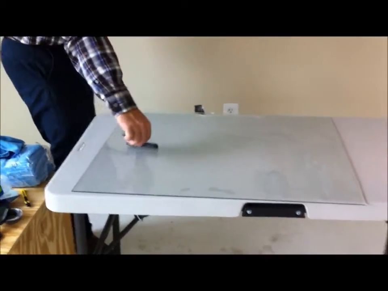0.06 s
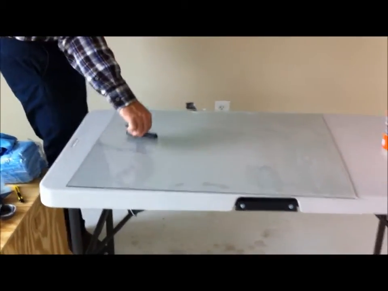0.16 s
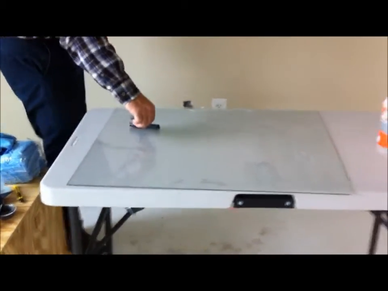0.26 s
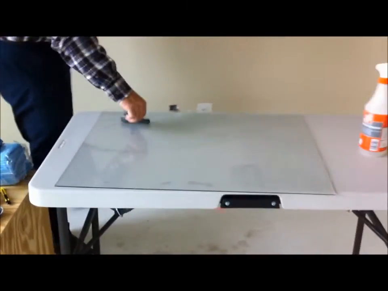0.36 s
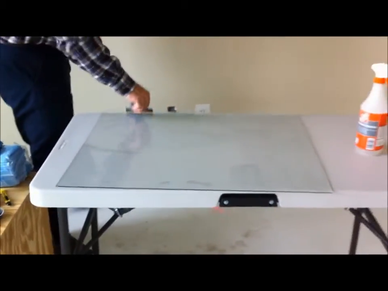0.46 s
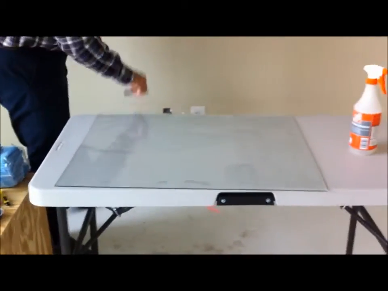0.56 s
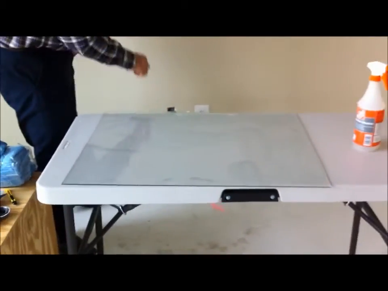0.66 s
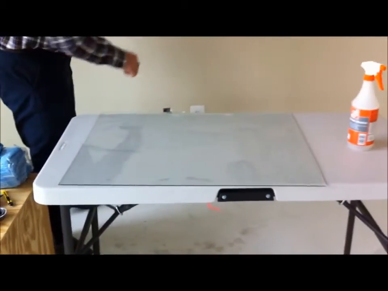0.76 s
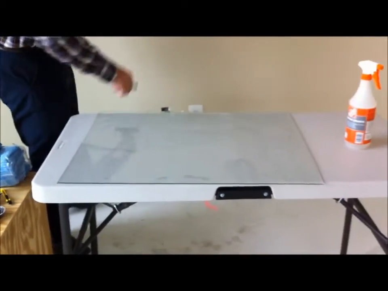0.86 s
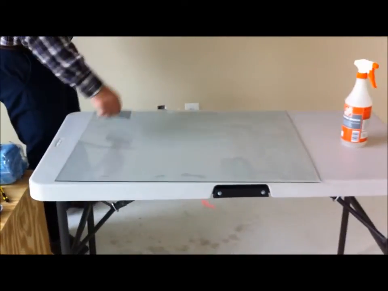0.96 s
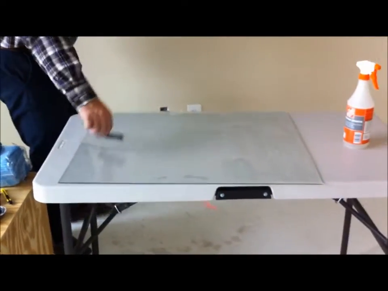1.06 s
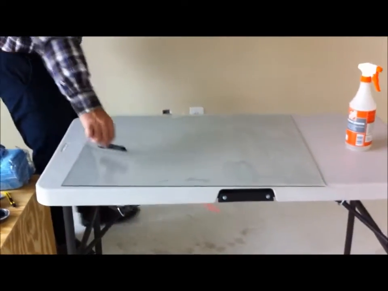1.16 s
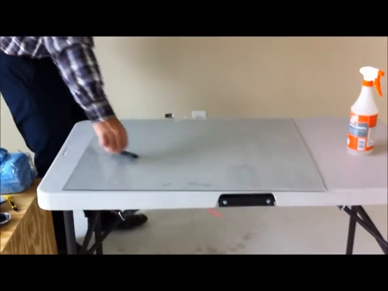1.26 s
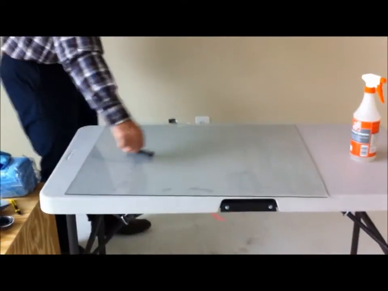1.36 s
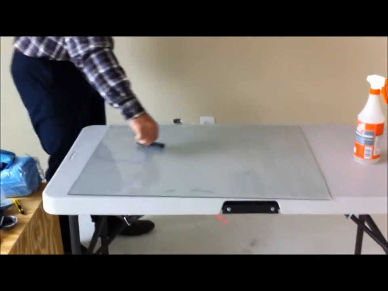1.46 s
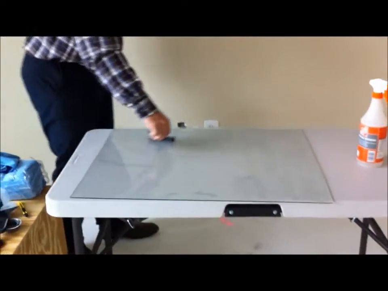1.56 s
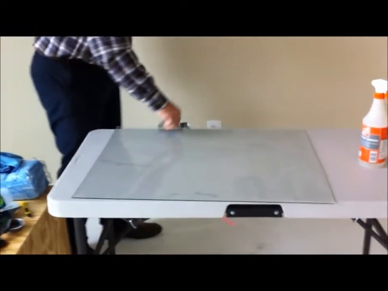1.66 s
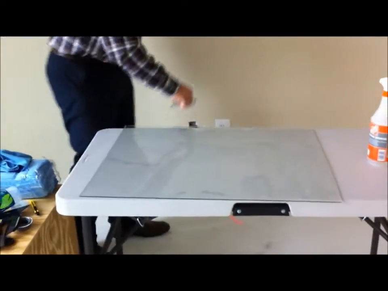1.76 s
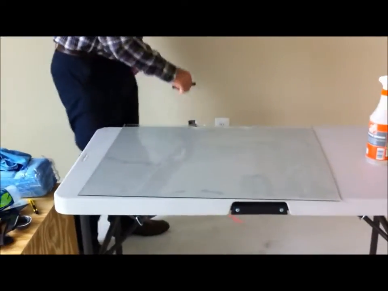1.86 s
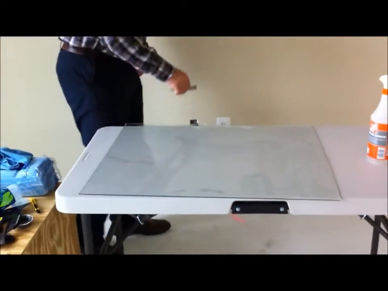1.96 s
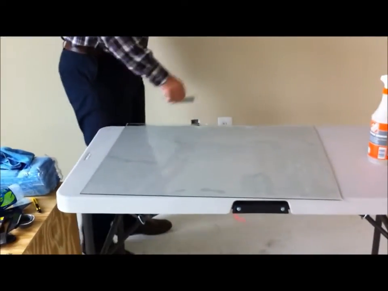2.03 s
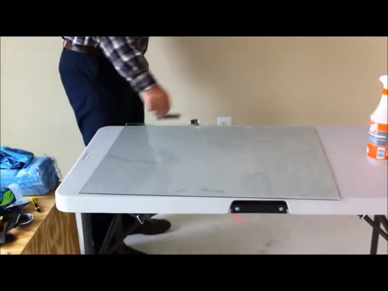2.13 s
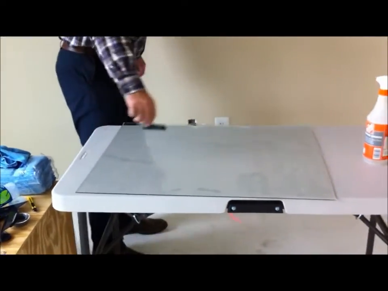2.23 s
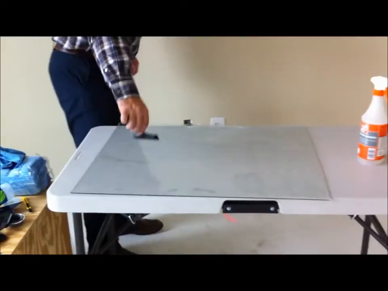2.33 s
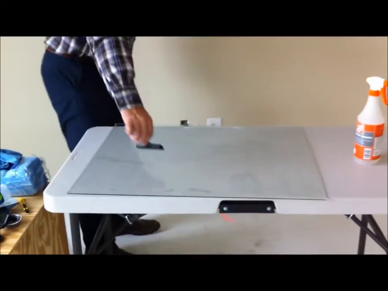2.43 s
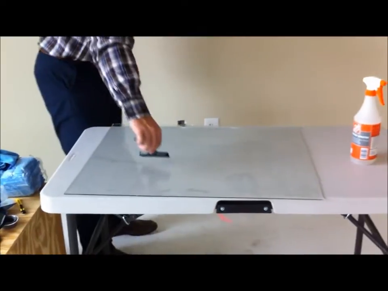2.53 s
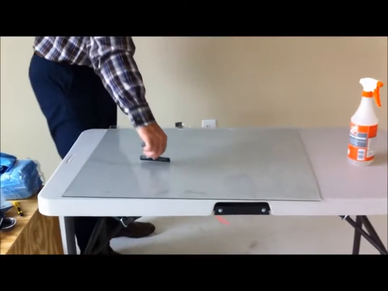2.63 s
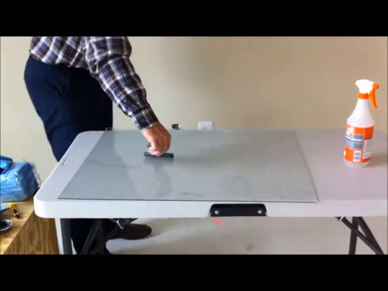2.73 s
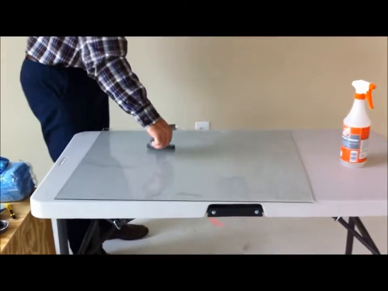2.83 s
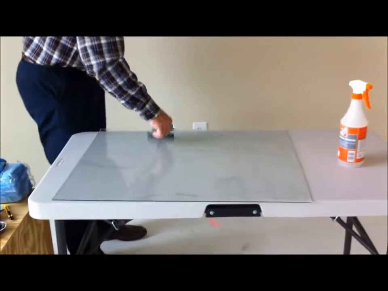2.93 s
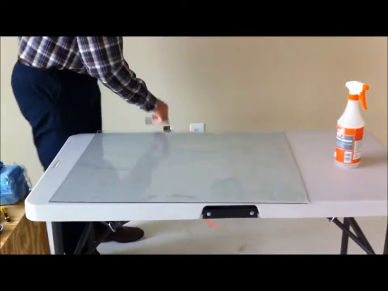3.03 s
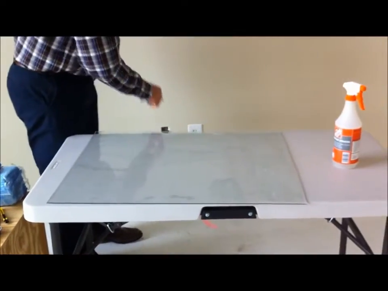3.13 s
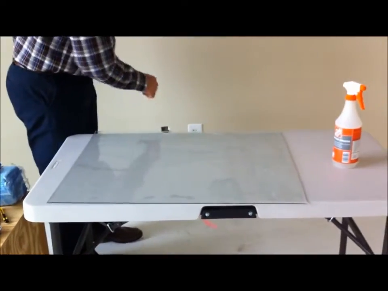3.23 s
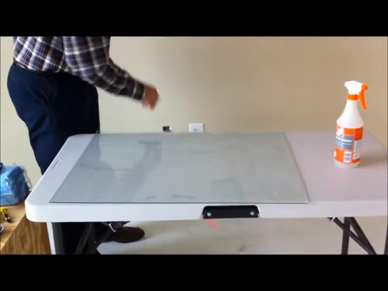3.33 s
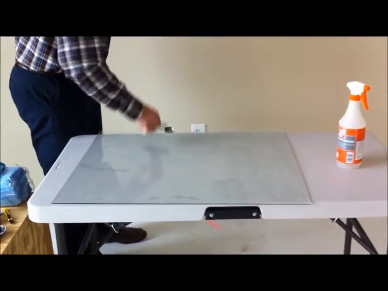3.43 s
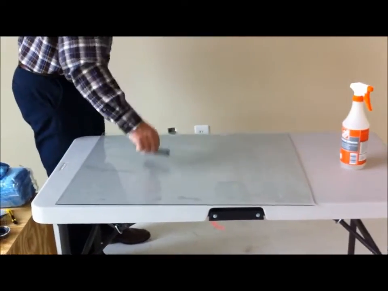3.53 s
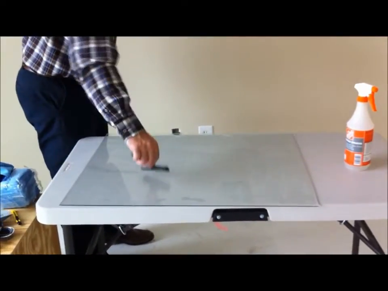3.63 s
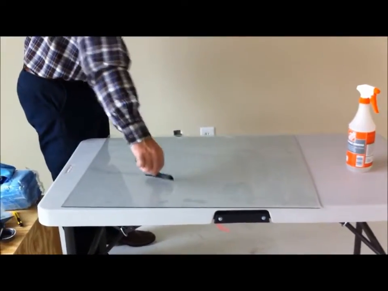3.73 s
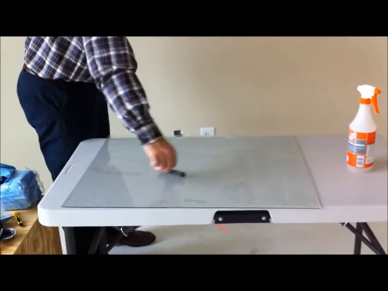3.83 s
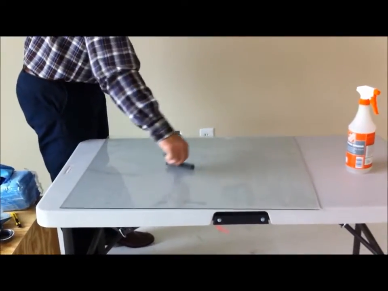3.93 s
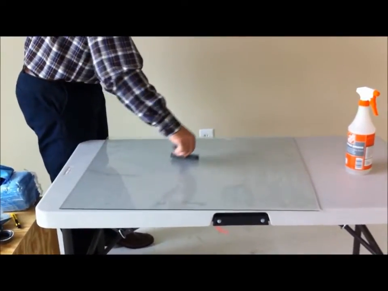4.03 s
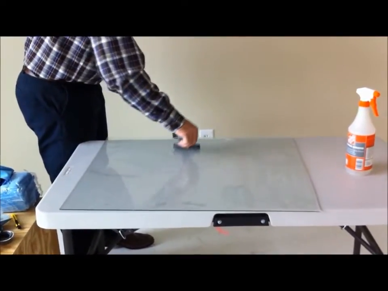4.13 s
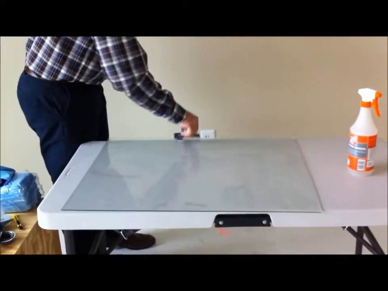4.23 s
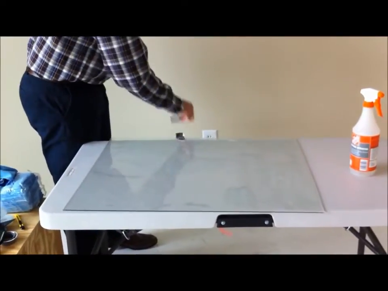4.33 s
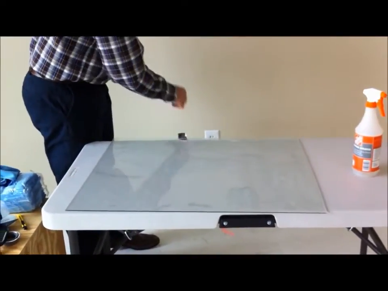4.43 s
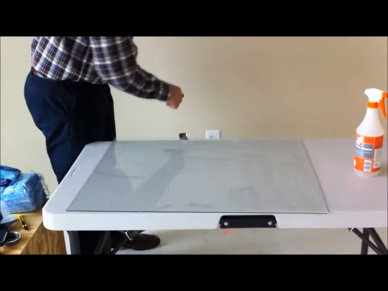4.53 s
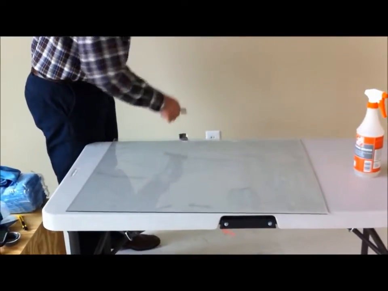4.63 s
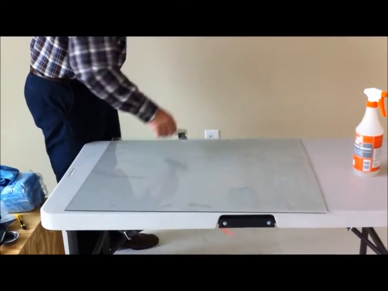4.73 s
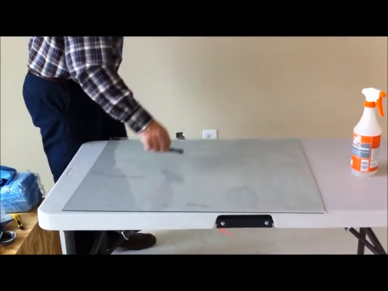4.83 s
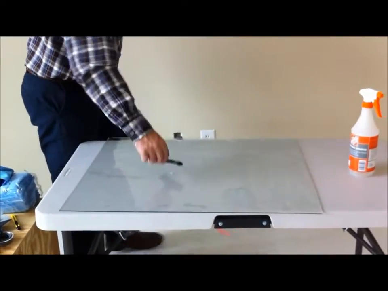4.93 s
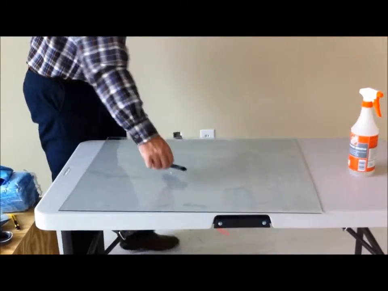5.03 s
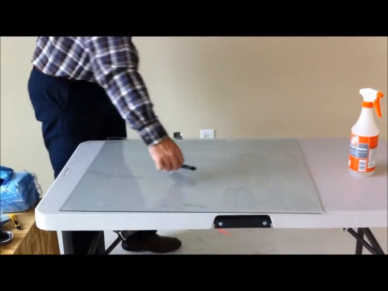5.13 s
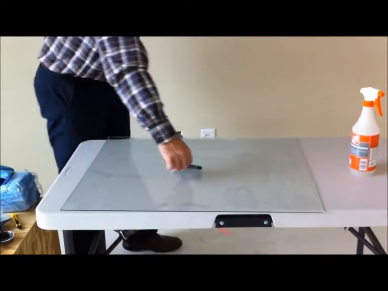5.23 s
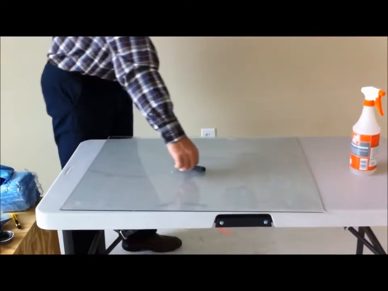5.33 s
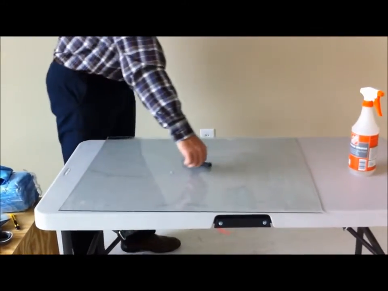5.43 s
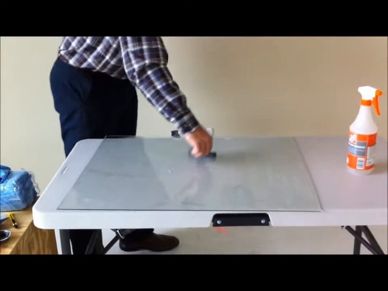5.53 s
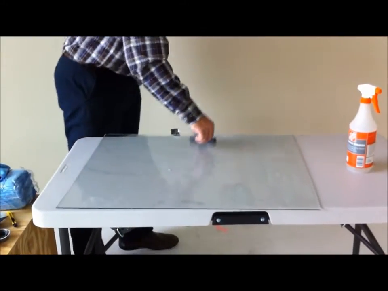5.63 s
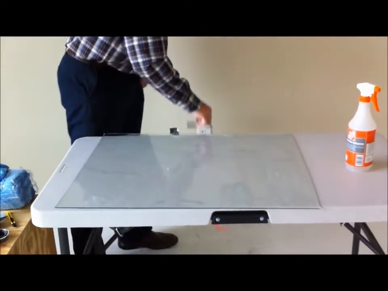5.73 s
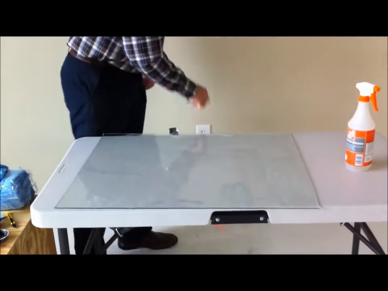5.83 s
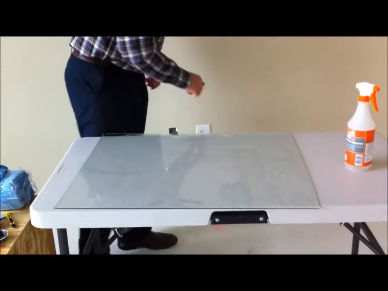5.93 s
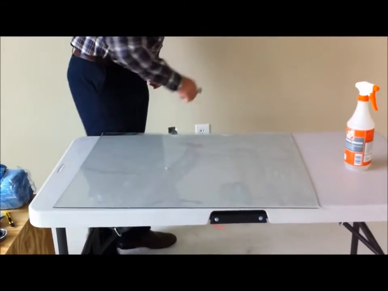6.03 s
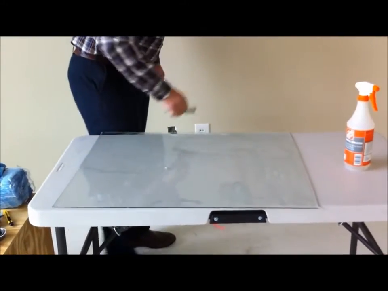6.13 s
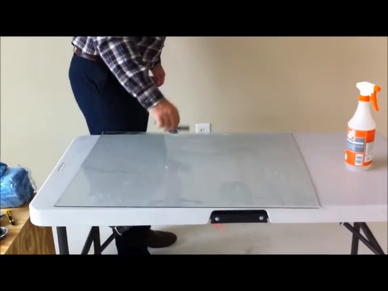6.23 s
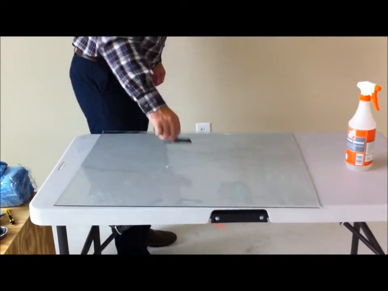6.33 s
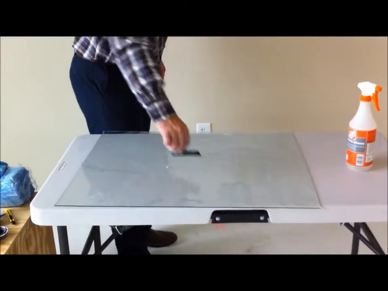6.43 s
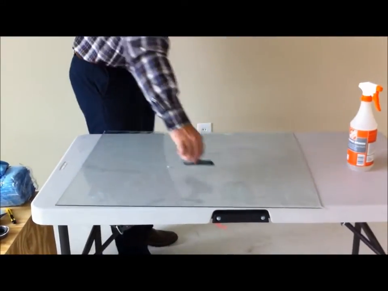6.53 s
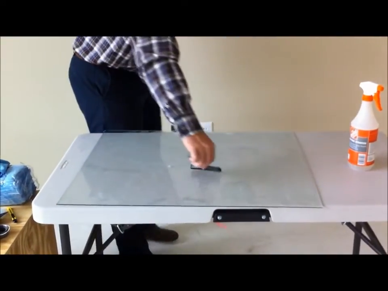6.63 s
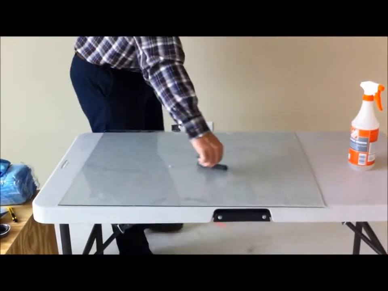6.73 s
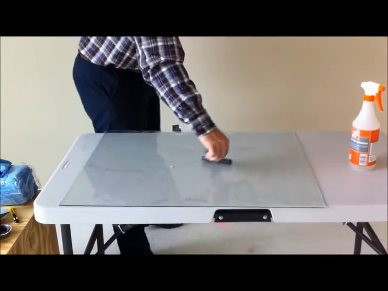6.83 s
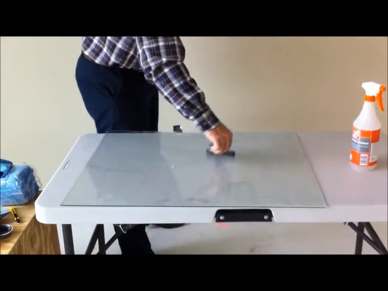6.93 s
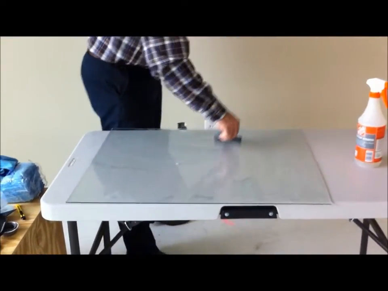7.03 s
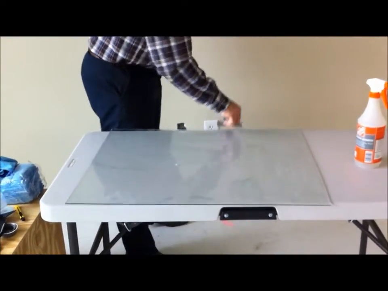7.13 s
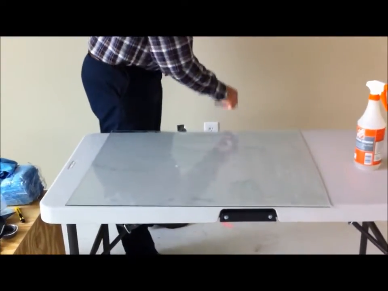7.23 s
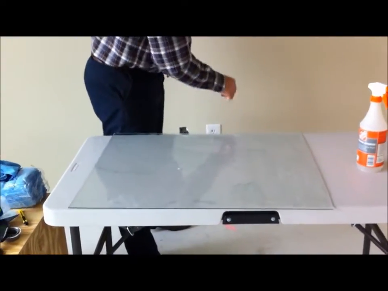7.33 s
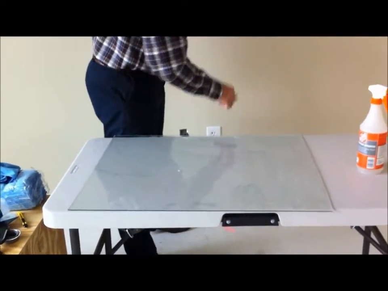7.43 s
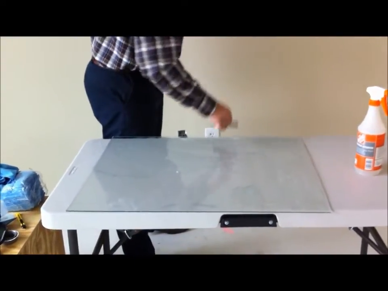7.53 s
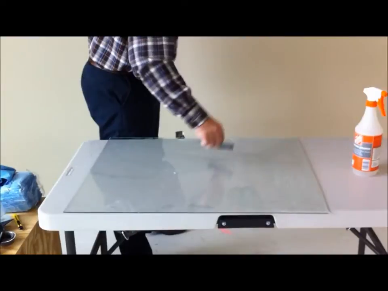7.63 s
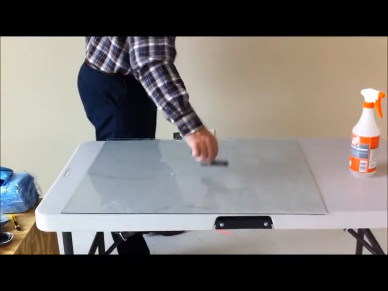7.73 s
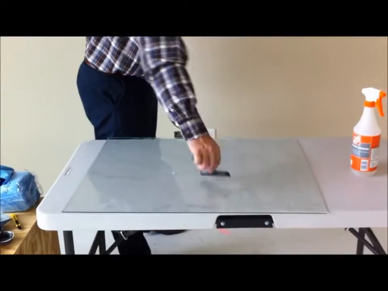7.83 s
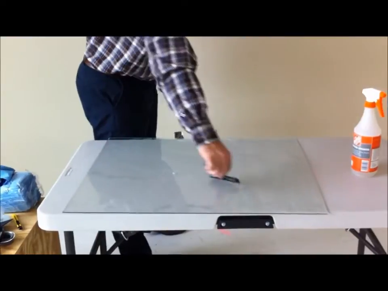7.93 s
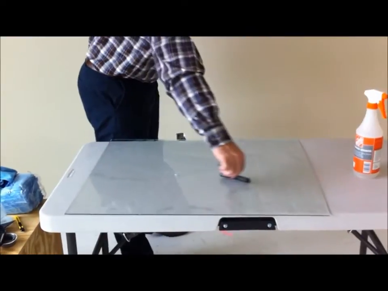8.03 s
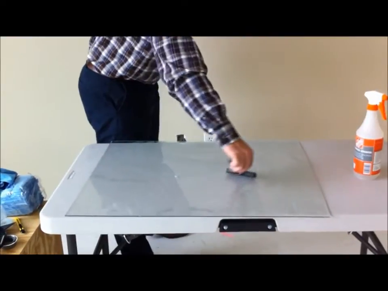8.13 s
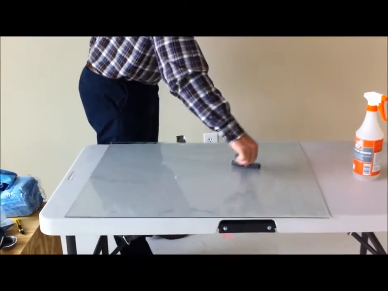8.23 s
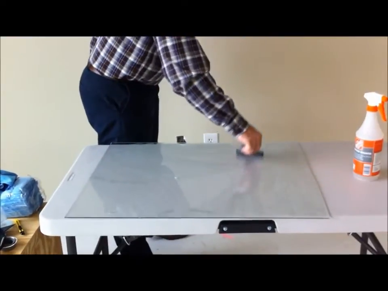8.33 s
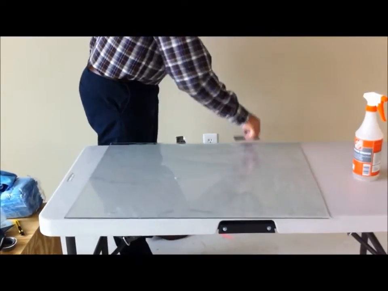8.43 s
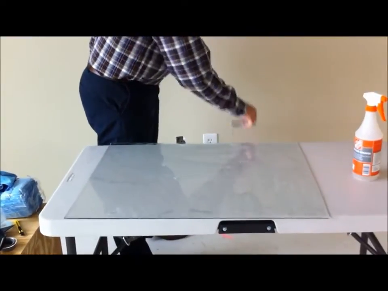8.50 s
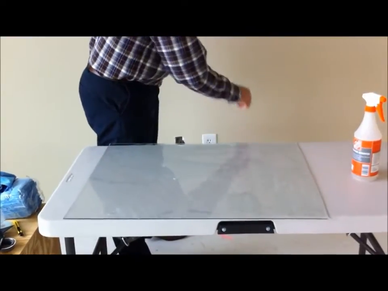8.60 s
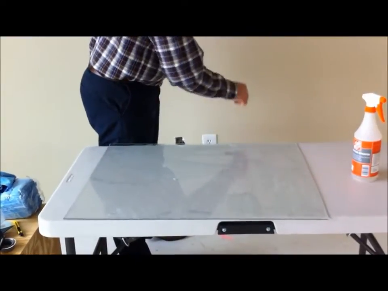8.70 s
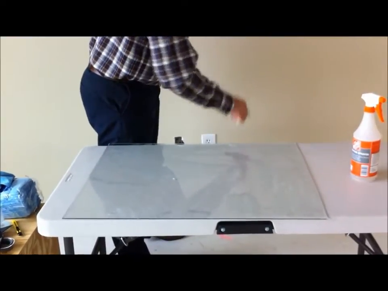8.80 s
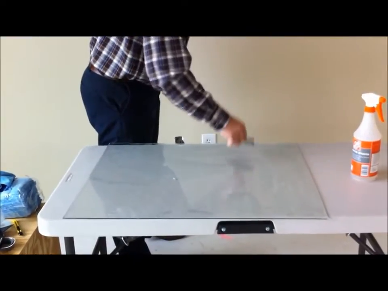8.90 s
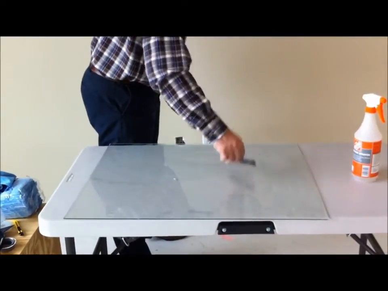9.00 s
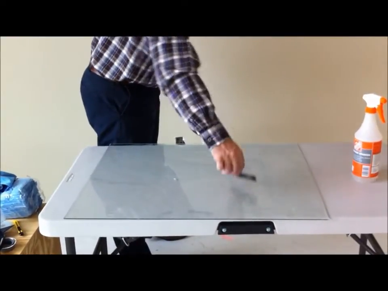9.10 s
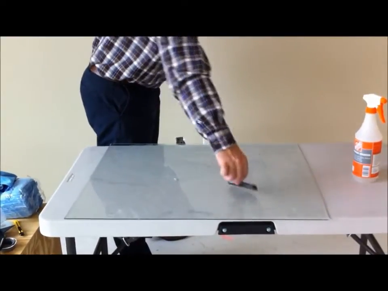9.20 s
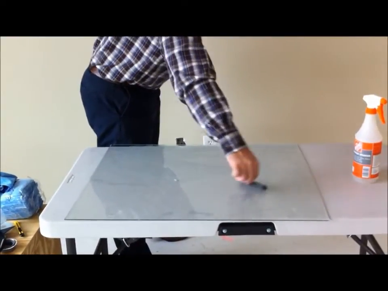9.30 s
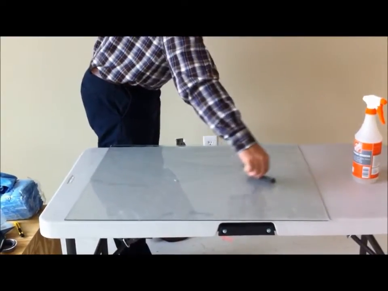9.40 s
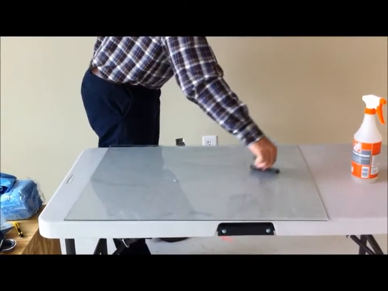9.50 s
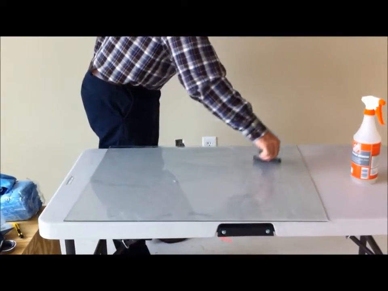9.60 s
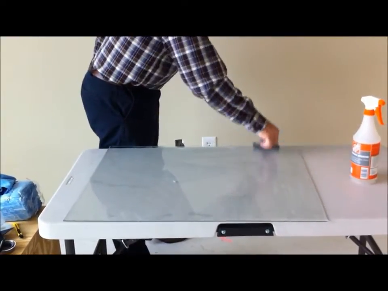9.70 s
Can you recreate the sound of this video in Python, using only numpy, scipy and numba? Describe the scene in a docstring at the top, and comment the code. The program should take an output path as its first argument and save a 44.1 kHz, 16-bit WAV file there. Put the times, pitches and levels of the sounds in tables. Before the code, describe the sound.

A steel scraper makes eight short hissing strokes across wet glass on a plastic table, clicking down and snapping sharply off the edge.

```python
"""A steel scraper lands, mostly with a bounce, on a wet pane lying on a plastic table: the blade clicks,
pane and table top thud. It hisses across the water film, singing higher as it tilts, and grit ticks under it.
Most of the eight strokes end with the blade snapping off the far edge in a chatter and a spray of water.
Feet and cloth bump softly now and then; a bare room echoes it all over quiet house noise."""
import sys
import numpy as np
from scipy import signal
from scipy.fft import rfft, irfft
from scipy.io import wavfile
from scipy.ndimage import uniform_filter1d
from numba import njit

SR = 44100
rng = np.random.default_rng(int(sys.argv[2]) if len(sys.argv) > 2 else 0)


def wav_out(sig):
    """Save sig, one row per channel (or a flat mono array), as 16-bit PCM at SR to the path in sys.argv[1]."""
    wavfile.write(sys.argv[1], SR, np.round(np.clip(np.atleast_2d(sig).T, -1, 1) * 32767).astype(np.int16))


N = 430411

# start_s, end_s, end_hiss_db, hiss_swell_db, end_song_over_hiss_db, end_song_hz
STROKES = [(0.112, 0.542, -55.5, 10.5, -4.5, 4200), (1.348, 1.765, -58.5, 3.5, -4, 4200),
           (2.725, 3.074, -60.5, 7.5, -5.5, 3950), (3.856, 4.311, -59, 6.5, -6.5, 3980),
           (5.367, 5.77, -60, 6, -1.5, 4350), (6.76, 7.196, -60.5, 5, -5, 4250),
           (8.062, 8.52, -60.5, 6, -9, 4280), (9.345, 9.8, -61, 3.5, -4.5, 4000)]
SONG_START_HZ, SONG_BEND, SONG_SWELL_DB, LIFT_DB_PER_S = 3320, 1.9, 10, 900


def stroke_at(t):
    """Hiss and song swell as the blade tilts, pitch climbs most early on; both fade fast at lift-off."""
    hiss_db, song_db = np.full((2, len(t)), -np.inf)
    song_hz = np.full(len(t), float(SONG_START_HZ))
    for start_s, end_s, end_db, swell_db, over_db, end_hz in STROKES:
        on = t >= start_s
        left = np.clip((end_s - t[on]) / (end_s - start_s), 0, 1)
        hiss_db[on] = end_db - swell_db * left - LIFT_DB_PER_S * np.maximum(t[on] - end_s, 0)
        song_db[on] = hiss_db[on] + over_db - SONG_SWELL_DB * left
        song_hz[on] = end_hz - (end_hz - SONG_START_HZ) * left ** SONG_BEND
    return hiss_db, song_db, song_hz


# water film spectrum: freq_hz, gain_db
FILM_SPECTRUM = [(410, -39), (700, -5.5), (819, -5), (1600, -9), (2270, -6), (2960, -8.5), (4050, -5.5),
                 (4800, -3.5), (6320, -4.5), (8420, -7.5), (10800, -6.5), (15200, -6), (16000, -5.5)]
# blade modes that colour the hiss: pitch_hz, width_hz, gain_db
SHEEN_MODES = [(6200, 2200, -8), (10530, 2500, -9)]


def scrape():
    """Dense slips hiss through the water film; rarer big ones make the blade sing, pitched by its angle."""
    hiss_db, song_db, song_hz = stroke_at(np.arange(N) / SR)
    song_hz *= 1 + 0.027 * walk(25)  # unsteady hand
    slips = rng.standard_normal(N) * undb(1.2 * rng.exponential(size=N) + 1.2 * walk(40))
    big_slips = rng.standard_normal(N) * undb(4 * rng.exponential(size=N) + 3 * walk(70))

    def resonance(hz, width_hz):
        return unit(bandpass(bandpass(big_slips, hz, width_hz), hz, width_hz))

    sheen = sum(undb(db + 2 * walk(30)) * resonance(hz, width_hz) for hz, width_hz, db in SHEEN_MODES)
    hiss = colour(slips, FILM_SPECTRUM) + sheen
    return undb(hiss_db) * hiss + undb(song_db) * resonance(song_hz, width_hz=520)


# blade touchdowns: start_s, click_db, thud_db, boom_over_thud_db, tilt_db_per_octave
LANDINGS = [(0.107, -34.5, -51.5, 3.5, -14), (0.1159, -24, -47.5, -10, 7), (1.3355, -33.5, -52.5, 2, -8),
            (1.3522, -19, -43, -4.5, -1.5), (2.7325, -25, -44, 0, 0), (3.8232, -37.5, -53, 5, 16),
            (3.8585, -27.5, -47, -4, 1), (5.3386, -35, -60, 16.5, -4), (5.366, -24, -48, 3, -5),
            (6.7449, -34, -60, 9.5, -2), (6.7606, -24.5, -44.5, -3, -18), (8.001, -40, -62, 14, 14),
            (8.0586, -25.5, -45.5, -6.5, 2), (9.3119, -40, -57, 3, 3), (9.3486, -33.5, -50, 1, -12)]


def landings():
    """The blade lands and bounces, each time one crisp touch; harder clicks throw more spray."""
    out = np.zeros(N)
    for start_s, click_db, thud_db, boom_db, tilt in LANDINGS:
        spray_db = -38 + .35 * (click_db + 30)
        add(out, start_s - LEAD_S, blow(click_db, thud_db, spray_db, boom_db, tilt,
                                        clack_db=4.5, chatter_ms=.59, hardest=3.7, spray_ms=.6))
    return out


# blade leaving the pane: start_s, click_db, thud_db, spray_db
SNAPS = [(0.5597, -8, -32.5, -29), (3.0765, -11, -34.5, -31), (4.3168, -9.5, -33.5, -35),
         (5.7742, -11, -38, -23), (7.204, -63, -92, -21), (8.5102, -12, -36.5, -19)]


def snaps():
    """The blade snaps off the far edge with a longer, bright chatter."""
    out = np.zeros(N)
    for start_s, click_db, thud_db, spray_db in SNAPS:
        add(out, start_s - LEAD_S, blow(click_db, thud_db, spray_db, boom_db=-12.5, tilt_db_per_octave=12,
                                        clack_db=12, chatter_ms=3.8, hardest=1.8, spray_ms=5.7))
    return out


# steel blade: pitch_hz, width_hz, gain_db
BLADE_MODES = [(3490, 380, 12.5), (4250, 600, 11.5), (5490, 670, 17.5), (6340, 490, 11)]
# pane: pitch_hz, gain_db, t60_s
PANE_MODES = [(338.6, -14, 0.15), (464, 2, 0.032), (552, -17, 0.09), (593, -24, 0.02), (760, -3.5, 0.062),
              (820, -7.5, 0.06), (943, -6.5, 0.045), (1056, -3, 0.039), (1232, -15, 0.019),
              (1386, -17.5, 0.046), (1733, -16.5, 0.055), (2180, -14.5, 0.03)]
# plastic table top: pitch_hz, gain_db, t60_s
TABLE_MODES = [(146, -0.5, 0.1), (162.5, -17.5, 0.11), (194.7, 6, 0.089), (252.3, 0.5, 0.11),
               (279.6, -6.5, 0.15)]
LEAD_S = .01  # time for chatter ahead of the main contact


def blow(click_db, thud_db, spray_db, boom_db, tilt_db_per_octave, clack_db, chatter_ms, hardest, spray_ms):
    """Contacts ring blade, pane and table and spray water; the room gets the blow's smooth mean colour."""
    direct, to_room = np.zeros((2, SR))
    blade = sum(undb(db + tilt_db_per_octave * np.log2(hz / 4500)) * ring(hz, 1.36 / width_hz, 600)
                for hz, width_hz, db in BLADE_MODES)
    # each spot struck weighs the modes anew
    modes = [undb(db) * ring(hz, t60_s, 9000) for hz, db, t60_s in PANE_MODES + TABLE_MODES]
    weights = np.sign(rng.standard_normal(len(modes))) * undb(2 * rng.standard_normal(len(modes)))
    struck = [weight * mode for weight, mode in zip(weights, modes)]
    pane, table = sum(struck[:len(PANE_MODES)]), sum(struck[len(PANE_MODES):])
    thud = peak(pane, thud_db) + peak(table, thud_db + boom_db)
    first_push = thud * np.exp(-np.arange(9000) / SR / .013)
    add(direct, LEAD_S, thud)
    add(to_room, LEAD_S, undb(3) * first_push)

    click = peak(blade, click_db)
    clack = peak(ring(890, .00041, 600), thud_db + clack_db)  # upper pane modes merge into one hump
    spray = peak(ring(9450, .00058, 40), spray_db)
    # click and spray beam at the listener, so the room gets less
    for body, swell_ms, room_db in (click, chatter_ms, -8), (clack, chatter_ms + 2.31, 0), (spray, spray_ms, -5):
        add(direct, LEAD_S - .63 * chatter_ms / 1000, signal.fftconvolve(chatter(swell_ms, hardest), body))
        add(to_room, LEAD_S, undb(room_db) * body)
    return room(direct, to_room, tail_db=-23.5)


def chatter(swell_ms, hardest):
    """Dense small contacts swell, peak in one hard contact and die away; energy 1."""
    age = np.arange(2500) / SR / (swell_ms / 1000)
    contacts = rng.standard_normal(2500) * age * np.exp(1 - age)
    contacts[int(swell_ms * SR / 1000)] = hardest
    return contacts / np.sqrt(np.sum(contacts ** 2))


# sharp blade ticks, from grit and one light first touch on the pane: start_s, level_db, pitch_hz
SHARP_TICKS = [(0.189, -36.5, 4570), (0.434, -47, 3640), (0.4692, -38, 4940), (0.4773, -38, 2760),
               (1.412, -39.5, 3530), (1.453, -31.5, 4030), (1.714, -41.5, 3770), (1.742, -50, 3950),
               (1.757, -44, 6060), (2.7283, -38, 5760), (3.9518, -46.5, 3300), (4.047, -50, 3950),
               (4.072, -39, 3480), (4.267, -45, 4080), (4.3, -34, 4050), (5.4818, -41, 4750),
               (5.493, -40, 4170), (5.517, -42, 6450), (5.565, -42.5, 4130), (5.631, -53, 4070),
               (5.692, -48, 4070), (5.7544, -47, 4200), (6.837, -44, 4150), (6.8655, -47.5, 3430),
               (7.0278, -41.5, 3960), (7.1974, -32, 4040), (7.207, -29, 4500), (8.102, -47, 4100)]


def blade_ticks():
    """Each grain or light touch flicks the blade once, in a contact of about 0.1 ms."""
    out = np.zeros(N)
    rise = 1 - np.exp(-np.arange(400) / SR / .00012)
    blade = sum(undb(db) * ring(hz, t60_s, 400)
                for (hz, _, _), db, t60_s in zip(SHEEN_MODES, (-2.5, -7), (.004, .002)))
    blade += .4 * ring(BLADE_MODES[0][0], .003, 400)
    for start_s, level_db, pitch_hz in SHARP_TICKS + fine_grit():
        add(out, start_s, peak(rise * (ring(pitch_hz, .005, 400) + blade), level_db))
    return out


def fine_grit(per_stroke=6):
    """Small grains at chance places along each stroke flick the blade at the pitch of its song."""
    start_s, end_s = np.transpose(STROKES)[:2, :, None]
    times_s = start_s + (end_s - start_s) * rng.random((len(STROKES), per_stroke))
    times_s = np.minimum(times_s, N / SR - .02).ravel()
    _, song_db, song_hz = stroke_at(times_s)
    level_db = song_db + 10 + 2 * rng.exponential(size=len(times_s))
    return list(zip(times_s, level_db, song_hz))


# feet and cloth: start_s, tap_db, pitch_hz, t60_s, rustle_db
BUMPS = [(0.347, -48.5, 327, 0.013, -65), (1.155, -47, 261, 0.0089, -55), (1.779, -51.5, 760, 0.0074, -63),
         (2.289, -59, 840, 0.013, -63), (5.105, -52, 810, 0.0033, -85), (5.155, -52, 406, 0.016, -61.5),
         (6.085, -44, 760, 0.0024, -66), (6.288, -45, 280, .018, -66), (6.304, -55, 705, 0.034, -81),
         (6.89, -41, 294, .02, -54)]


def bumps():
    """Feet and cloth give dull taps, each with a short rustle."""
    out = np.zeros(N)
    fade = np.exp(-np.arange(3000) / SR / .02)
    for start_s, tap_db, pitch_hz, t60_s, rustle_db in BUMPS:
        rustle = bandpass(rng.standard_normal(3000), 3500, 5300) * fade
        add(out, start_s, undb(tap_db) * ring(pitch_hz, t60_s, 3000) + undb(rustle_db) * rustle)
    return out


# bare room's tail: centre_hz, gain_db, t60_s
ROOM_BANDS = [(135, 2, 0.29), (287, 3, 0.49), (499, -2, 0.48), (890, 6, 0.22), (2130, -9, 0.65),
              (3520, -3, 0.3), (9300, -8.5, 0.53), (13000, 6, 0.23)]
WALL_MS, WALL_DB = 14, -10


def room(direct, to_room, tail_db):
    """One wall echo, then a diffuse tail; every source and spot has a tail of its own."""
    t = np.arange(SR * 3 // 4) / SR
    tail = np.zeros(len(t))
    for hz, db, t60_s in ROOM_BANDS:
        band = bandpass(rng.standard_normal(len(t)), hz, .7 * hz)
        tail += undb(db + tail_db) * band * np.exp(-np.log(1000) * t / t60_s)
    tail *= np.minimum(t / .0015, 1)
    echo = undb(WALL_DB) * np.pad(direct, (int(WALL_MS * SR / 1000), 0))[:len(direct)]
    return direct + echo + signal.fftconvolve(to_room, tail)[:len(direct)]


# air and microphone hiss: freq_hz, gain_db
AIR_SPECTRUM = [(15, -75), (25, -45), (87, -18), (149, -6.5), (256, -5.5), (335, -11), (363, -9),
                (439, -19), (476, -16), (754, -23), (988, -19.5), (1230, -23.5), (1400, -23.5),
                (16000, -29.5)]
# far drone: time_s, pitch_hz, level_db
DRONE = [(3.2, 125, -76), (4.93, 120.3, -79), (5.03, 108.3, -77), (7.05, 106.4, -76.5), (7.13, 121.6, -82),
         (7.6, 119, -79)]


def house():
    """Steady air and hiss, the building's restless bass murmur, and a far drone that comes and goes."""
    air = colour(rng.standard_normal(N), AIR_SPECTRUM) * undb(-68.5 + .5 * walk(6))
    murmur_db = -77 + 1.8 * walk(2.35) + 1.2 * walk(15)
    murmur = undb(murmur_db) * unit(bandpass(rng.standard_normal(N), 220, 230))
    t = np.arange(N) / SR
    time_s, pitch_hz, level_db = np.transpose(DRONE)
    fade = np.interp(t, time_s[[0, 1, -2, -1]], [0, 1, 1, 0])
    drone_rms = undb(np.interp(t, time_s, level_db) + 1.4 * walk(7)) * fade
    drone_hz = np.interp(t, time_s, pitch_hz) + 2.37 * walk(20)
    drone = drone_rms * np.sqrt(2) * np.sin(2 * np.pi * np.cumsum(drone_hz) / SR)
    return air + murmur + drone


def undb(db):
    return 10 ** (np.asarray(db) / 20)


def unit(x):
    return x / np.sqrt(np.mean(x ** 2))


def peak(x, db):
    return undb(db) * x / np.abs(x).max()


def add(out, start_s, x):
    i = int(start_s * SR)
    out[i:i + len(x)] += x[:N - i]


def ring(hz, t60_s, samples):
    """A decaying sine."""
    t = np.arange(samples) / SR
    return np.sin(2 * np.pi * hz * t) * np.exp(-np.log(1000) * t / t60_s)


def colour(x, spectrum):
    """Shape x by (freq_hz, gain_db) points; rms 1."""
    hz, db = np.transpose(spectrum)
    bins_hz = np.arange(len(x) // 2 + 1) * SR / len(x) + 1
    gain = undb(np.interp(np.log(bins_hz), np.log(hz), db))
    return unit(irfft(rfft(x) * gain, len(x)))


def walk(rate_hz):
    """Random steps, smoothed twice; rms 1."""
    hold = int(SR / rate_hz)
    steps = np.repeat(rng.standard_normal(N // hold + 1), hold)
    return unit(uniform_filter1d(uniform_filter1d(steps, hold), hold)[:N])


def bandpass(x, hz, width_hz):
    """Gain 1 at a steady or moving centre."""
    return svf(x, hz * np.ones(len(x)), float(width_hz))


@njit
def svf(x, hz, width_hz):
    """State-variable filter, band output."""
    y, band_state, low_state = np.empty(len(x)), 0., 0.
    for i in range(len(x)):
        g, damping = np.tan(np.pi * hz[i] / SR), width_hz / hz[i]
        band = (band_state + g * (x[i] - low_state)) / (1 + g * (g + damping))
        band_state, low_state = 2 * band - band_state, low_state + 2 * g * band
        y[i] = damping * band
    return y


def scene():
    """Scraper and bumps in the room, over house noise; mono."""
    ticks, hiss, feet = blade_ticks(), scrape(), bumps()
    near = landings() + snaps()
    for source, tail_db in (ticks, -33), (hiss, -38), (feet, -30):
        near += room(source, source, tail_db)
    # small sources move little air in the deep bass
    near = signal.sosfilt(signal.butter(4, 135, "high", fs=SR, output="sos"), near)
    return (near + house())[None]


def record(dry):
    """Steep low-pass at 15.9 kHz."""
    return signal.sosfilt(signal.ellip(10, .2, 70, 15900, fs=SR, output="sos"), dry)


dry = scene()
out = record(dry)
wav_out(out)
```